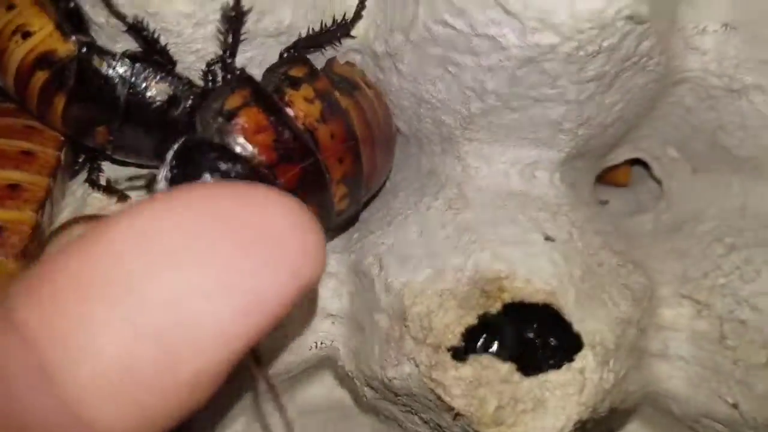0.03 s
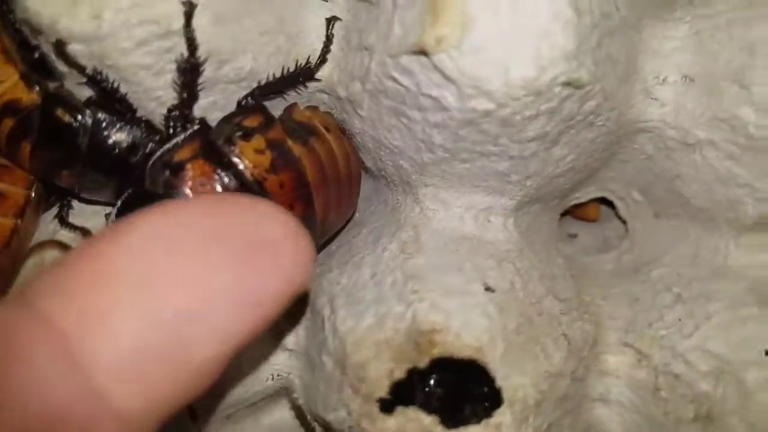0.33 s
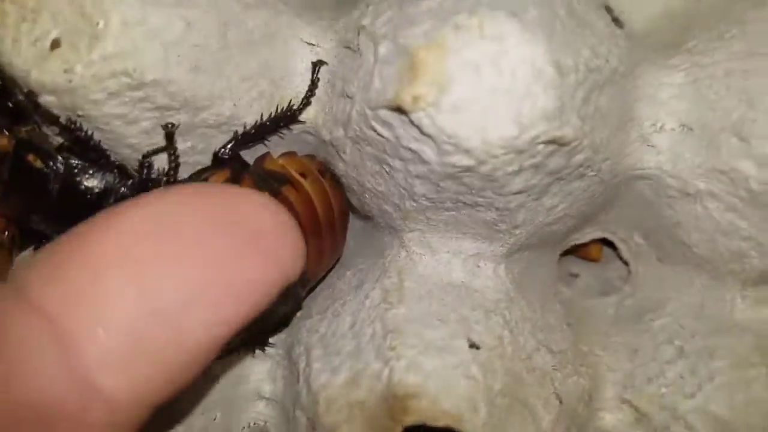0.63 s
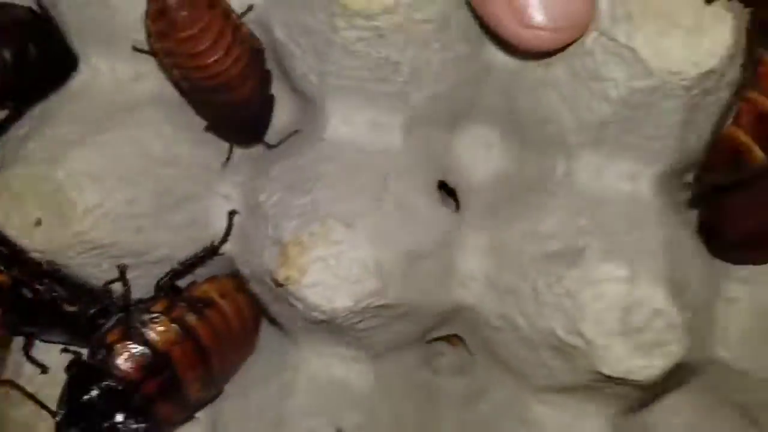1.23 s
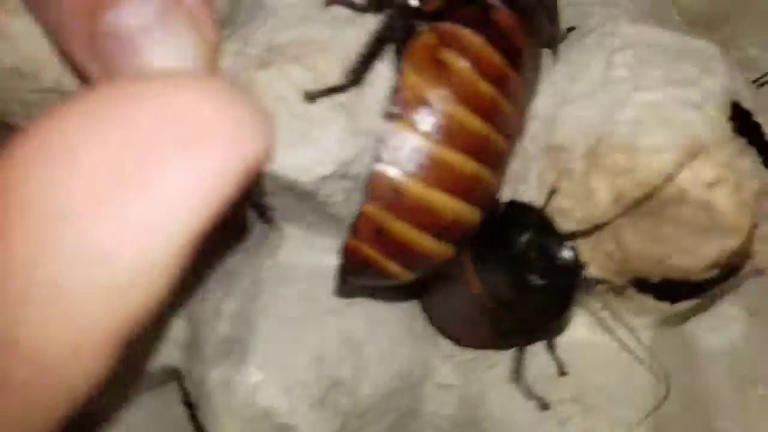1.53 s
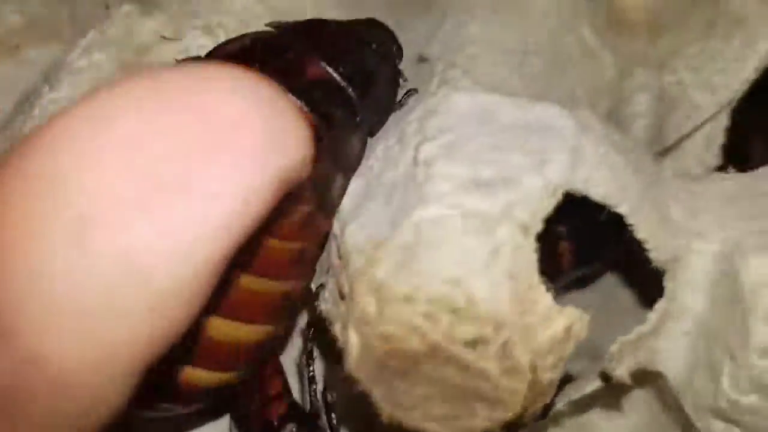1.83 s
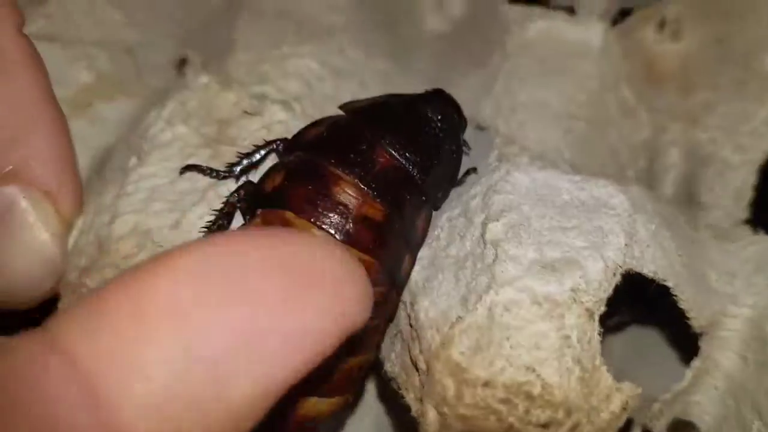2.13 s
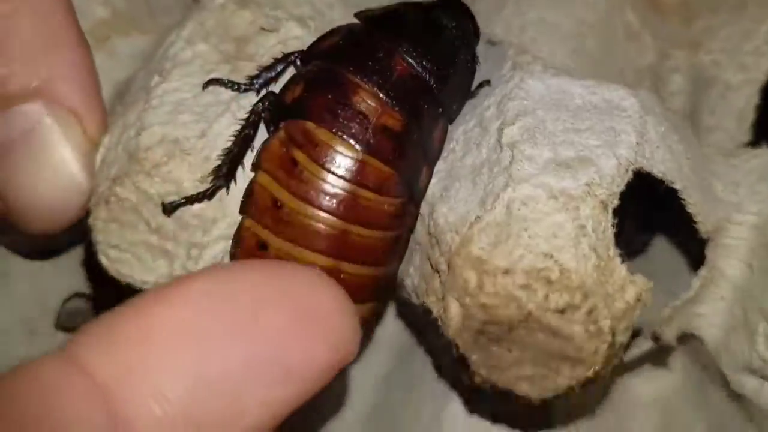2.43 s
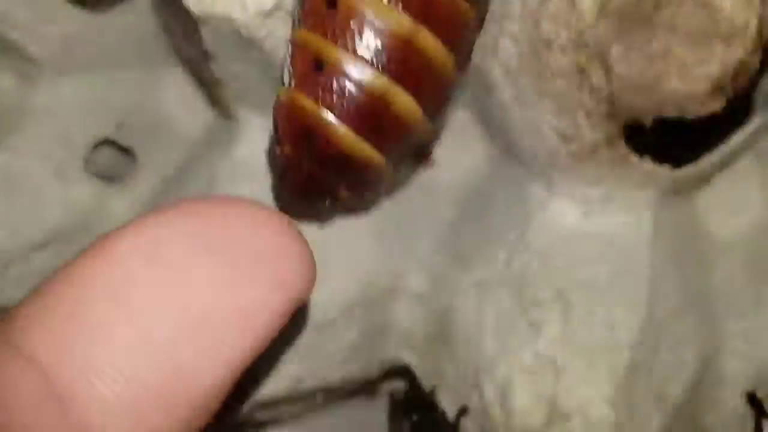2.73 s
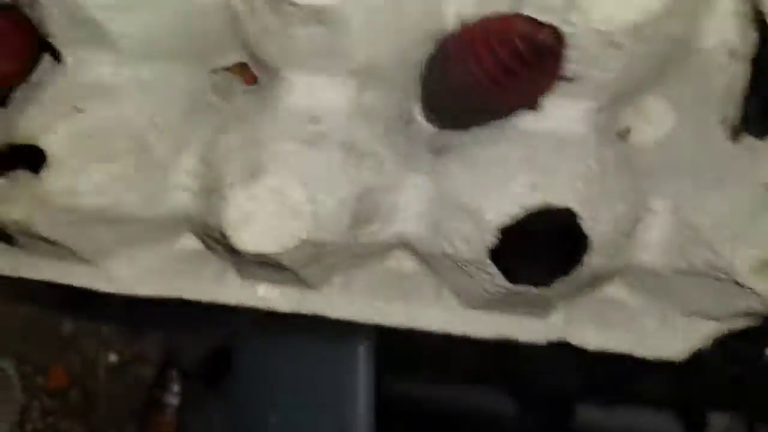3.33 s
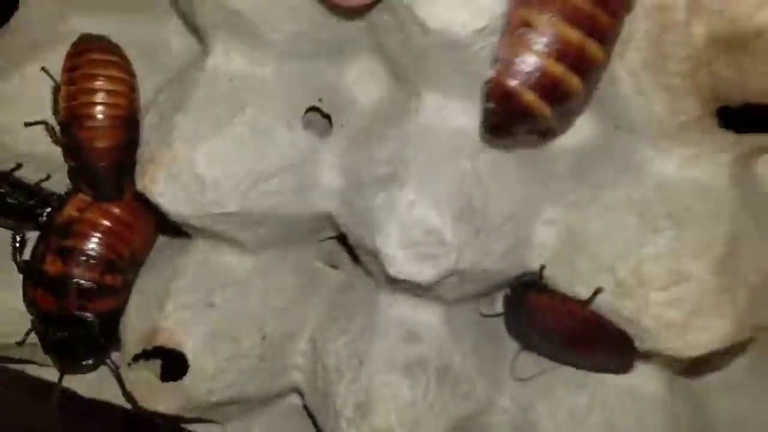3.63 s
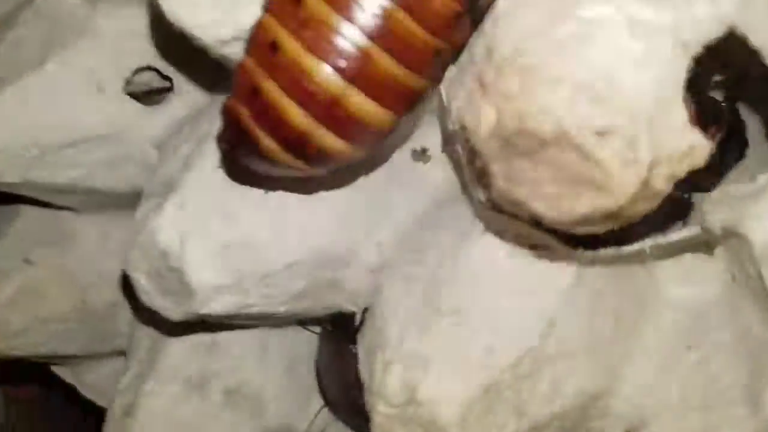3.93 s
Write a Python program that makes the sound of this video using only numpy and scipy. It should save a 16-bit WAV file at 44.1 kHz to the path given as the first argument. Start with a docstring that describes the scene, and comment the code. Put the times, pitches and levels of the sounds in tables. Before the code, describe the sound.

Cockroaches rustle and scratch on a cardboard egg tray, close by in a quiet room with a faint hum. Light prods make short, papery scrapes slightly to the right around 0.6 and 1.3 seconds. At 1.8 a fuller rubbing stroke starts on the left, with a sharper click and soft bump near 2.3. From 2.7 a finer scurrying runs until 4 seconds. Small claw ticks are scattered throughout.

```python
"""A finger prods hissing cockroaches on a cardboard egg tray, close to a hand-held phone in a quiet,
humming room. Shells, spiny legs and skin drag over the pulp in tiny slips: rumble, rasp and hiss.
First come light prods, a little to the right; at 1.8 s a fuller stroke on the left; from 2.7 s a
scurry with a finer grain. All along, feet scratch faintly, claws and shell edges tick, and the tray
takes a few soft bumps."""
import sys
import numpy as np
from scipy import signal
from scipy.fft import rfft, irfft
from scipy.io import wavfile

SR = 44100
rng = np.random.default_rng(int(sys.argv[2]) if len(sys.argv) > 2 else 0)


def log_audio(samples):
    """Write samples as a 16-bit WAV file to the path given in sys.argv[1]."""
    # one column per channel
    frames = np.atleast_2d(samples).T
    # limit to full scale, then quantise
    limited = np.clip(frames, -1, 1)
    pcm = np.round(limited * 32767).astype(np.int16)
    wavfile.write(sys.argv[1], SR, pcm)


N = 176400

# Room tone. Each row: frequency in Hz, relative level in dB.
ROOM_COLOUR = [(25, 0.5), (55, -25), (85, 3.5), (165, 4.5), (300, 4.5), (500, -10), (1000, -8),
               (2000, -6.5), (4000, -15), (8000, -17), (14500, -14)]
# Mains hum. Each row: frequency in Hz, peak level in dB.
MAINS_HUM = [(59.5, -72), (120, -73)]
# How alike the phone's two microphones hear noise. Each row: frequency in Hz, correlation.
MIC_CORRELATION = [(60, 0.8), (300, 0.79), (640, 0.52), (1400, 0.14), (2600, -0.044)]
# Modes of the bumped tray. Each row: frequency in Hz, relative level in dB.
BUMP_MODES = [(325, -7), (410, -3), (560, -4), (720, -3)]
# Soft bumps of the tray. Each row: start in seconds, peak in dB, decay of the lowest mode in seconds,
# left minus right in dB.
TRAY_BUMPS = [(0.443, -45, .004, -2), (0.652, -40, .004, -4), (1.158, -36.5, .002, -5),
              (1.803, -35.5, .02, 5), (2.2705, -27.5, .007, 0), (2.861, -33, .005, 3),
              (3.122, -35.5, .024, 4)]
# Resonances that colour ticks and rustle. Each row: centre in Hz, width in Hz, lift in dB.
CONTACT_RESONANCES = [(401, 55, 4), (716, 60, 3), (1136, 70, 3.5), (1662, 110, 4)]
# Ticks of claws and shells. Each row: start in seconds, ring pitch in Hz, ring level in dB,
# crack level in dB, decay in seconds, left minus right in dB.
CLAW_TICKS = [ (0.028, 2100, -48, -45, .002, -4), (0.146, 2200, -58, -53, .002, -4),
              (0.4305, 1820, -49, -56, .007, 2), (0.4905, 2000, -51, -42, .004, -9),
              (0.524, 4000, -48, -43, .0025, -8), (0.560, 11000, -40, -46, .0015, -5),
              (0.609, 2700, -46, -40, .0008, -5), (0.7025, 2900, -29.5, -37, .002, -3),
              (0.7095, 2740, -32.5, -44, .002, 6), (1.061, 4200, -56, -55, .003, -3),
              (1.157, 1600, -43, -56, .001, -4), (1.264, 1450, -34, -54, .004, -1),
              (1.413, 2900, -43, -52, .002, -3), (1.579, 3500, -53, -47, .002, -5),
              (1.935, 1650, -58, -45.5, 0.0071, -1), (2.1625, 1330, -40, -44, .007, -2),
              (2.261, 1560, -28, -29, .008, -1), (2.270, 5000, -40, -39, .005, 0),
              (2.5535, 920, -35, -42, .008, 0), (2.689, 2460, -54, -45, 0.008, 0),
              (2.8335, 1400, -31, -48, .0015, 2), (2.8565, 1500, -28.5, -46, .0018, 2),
              (2.867, 1510, -38, -45, 0.0019, -6), (2.982, 12000, -33, -38, .003, 8),
              (3.04, 1050, -37, -36, 0.006, 2), (3.117, 2200, -40, -36, .004, 4),
              (3.386, 2130, -40.5, -66, 0.0025, 4), (3.570, 1070, -39, -41, .002, -5),
              (3.593, 1420, -34, -48, 0.0013, 4), (3.648, 5000, -36, -37.5, .002, 6.5),
              (3.685, 3800, -36, -36, .0025, 4), (3.716, 1250, -34, -36, .0035, 0),
              (3.7355, 1400, -38, -43, .0025, -3)]
# Tone of a tick's crack. Each row: frequency in Hz, relative level in dB.
CRACK_COLOUR = [(300, -5), (1500, 7.5), (4000, 6), (7400, 1.5), (12000, .5), (14500, -3)]
# Swells of the three bursts of rustling. Each row: time in seconds, then rumble, rasp and hiss in dB.
PROD_LEVELS = [(0.0, -67.5, -67, -70.5), (0.42, -67.5, -72.5, -72.5), (0.48, -64.5, -62.5, -64),
               (0.555, -65, -59, -60), (0.575, -61, -50, -46.5), (0.598, -62, -55, -55),
               (0.69, -60, -49, -48.5), (0.742, -60, -51, -48.5), (0.781, -61, -58, -56),
               (0.83, -65, -56, -56.5), (0.889, -65.5, -66.5, -65.5), (1.22, -68, -71, -78),
               (1.266, -63, -53, -58), (1.294, -65, -60, -61), (1.312, -61, -51.5, -50),
               (1.338, -63, -56, -50), (1.364, -64, -63, -65.5), (1.6, -68.5, -66, -66),
               (1.791, -63, -59, -63)]
STROKE_LEVELS = [(1.79, -68, -70, -62), (1.806, -55, -49, -56), (1.832, -58, -59, -59),
                 (1.842, -55, -49, -48.5), (1.935, -48.5, -49.5, -49.5), (1.96, -54.5, -55, -56.5),
                 (2.03, -52.5, -50.5, -51.5), (2.152, -54.5, -50.5, -48), (2.17, -52, -40.5, -40.5),
                 (2.22, -56, -49.5, -48), (2.26, -53, -50, -48.5), (2.31, -53, -51.5, -51),
                 (2.39, -50, -51.5, -55), (2.532, -62.5, -56.5, -56), (2.568, -48, -44, -45),
                 (2.63, -62.5, -53, -53), (2.742, -64, -61, -61.5)]
SCURRY_LEVELS = [(2.739, -61, -52.5, -66), (2.8, -43.5, -50.5, -51), (2.87, -52.5, -47, -51),
                 (2.96, -46, -50, -51), (3.01, -49, -55.5, -53.5), (3.13, -56, -52.5, -51.5),
                 (3.19, -50.5, -54, -58), (3.28, -62.5, -57, -56.5), (3.351, -58.5, -58.5, -58.5),
                 (3.376, -57, -46.5, -46.5), (3.42, -58, -50, -53), (3.55, -57.5, -55, -54),
                 (3.604, -52, -49, -51.5), (3.635, -79, -61.5, -61.5), (3.68, -56, -52.5, -50),
                 (3.82, -61, -53.5, -52.5), (3.94, -49.5, -51.5, -53.5), (4.0, -65, -47.5, -49.5)]
# Tone of each burst. Each row: frequency in Hz, relative level in dB.
PROD_TONE = [(100, -4.5), (350, 0.5), (750, -6.5), (1150, 3.5), (1900, 2.5), (2800, 1.5), (6000, -4.5),
             (10000, -4.5), (14500, -7)]
STROKE_TONE = [(200, -0.5), (350, 2.5), (750, -1.5), (1600, -2.5), (2100, -6), (4000, -13.5), (7400, -18),
               (12000, -14), (14500, -19.5)]
SCURRY_TONE = [(200, 0), (350, 0), (750, -6.5), (1600, -6), (2100, -8.5), (4000, -9), (7400, -15),
               (12000, -11.5), (14500, -14)]

TIME = np.arange(N) / SR
BIN_HZ = np.maximum(np.arange(N // 2 + 1) * SR / N, 1)


def undb(db):
    """Decibels to amplitude."""
    return 10 ** (np.asarray(db) / 20)


def unit(x):
    """Scale to rms 1."""
    return x / np.sqrt(np.mean(x ** 2) + 1e-24)


def curve(points):
    """Join (Hz, value) points on a log axis, one value per bin."""
    hz, value = np.array(points, float).T
    return np.interp(np.log(BIN_HZ), np.log(hz), value)


def shape(x, db):
    """Minimum-phase filter with the given gain per bin."""
    cepstrum = irfft(db * np.log(10) / 20, N)
    cepstrum[1:N // 2] *= 2
    cepstrum[N // 2 + 1:] = 0
    return irfft(rfft(x) * np.exp(rfft(cepstrum)), N)


def low_cut(x, hz):
    """Gentle bass roll-off."""
    return signal.sosfilt(signal.butter(2, hz, "high", fs=SR, output="sos"), x)


def pan(db):
    """Constant-power gains; positive dB leans left."""
    return unit(undb([[db / 2], [-db / 2]]))


def mic_noise():
    """Noise at the two microphones: alike in the bass, unrelated in the treble."""
    likeness = curve(MIC_CORRELATION)
    mid, side = irfft(rfft(rng.standard_normal((2, N))) * np.sqrt([1 + likeness, 1 - likeness]), N)
    return unit(np.array([mid + side, mid - side]))


def resonance_db():
    """Lift of the contact resonances per bin."""
    return sum(db / (1 + (2 * (BIN_HZ - hz) / width) ** 2) for hz, width, db in CONTACT_RESONANCES)


def slips(per_s, spread_db, decay_s, smooth=0):
    """Envelope of tiny random slips of uneven size over a share of smooth sliding."""
    size = undb(spread_db * np.minimum(rng.exponential(size=N), 4))
    energy = (rng.random(N) < per_s / SR) * size ** 2
    energy = signal.lfilter([1], [1, -np.exp(-2 / (decay_s * SR))], energy)
    return unit(np.sqrt(energy / energy.mean() + smooth))


def room_tone(noise_db=-63):
    """Quiet room noise with mains hum, a little stronger in the left microphone."""
    hum = sum(undb(db) * np.sin(2 * np.pi * (hz * TIME + rng.random())) for hz, db in MAINS_HUM)
    air = unit(shape(mic_noise(), curve(ROOM_COLOUR)))
    return (undb(noise_db) * air + hum) * pan(2.2)


def reflections(direct, level_db=-16, decay_s=.05):
    """Faint, short reflections reach the phone from 3 ms after the direct sound."""
    t = np.arange(SR // 2) / SR
    tail = rng.standard_normal((2, len(t))) * np.exp(-t / decay_s) * (t > .003)
    tail /= np.sqrt(np.sum(tail ** 2, axis=1, keepdims=True))
    return undb(level_db) * signal.fftconvolve(direct, tail, axes=1)[:, :N]


def idle_feet(level_db=-68.5):
    """Feet shift on the pulp now and then; each scratch is a cluster of tiny spine clicks."""
    scratches = slips(per_s=16, spread_db=2, decay_s=.012)
    spines = slips(per_s=220, spread_db=3, decay_s=.0005)
    return undb(level_db) * unit(mic_noise() * scratches * spines)


def tray_bumps(pitch_spread=.04):
    """Soft knocks ring the hollow tray, a little differently at each spot; higher modes die sooner."""
    t, out = np.arange(SR // 10) / SR, np.zeros((2, N))
    hz, mode_db = np.array(BUMP_MODES, float).T[:, :, None]
    for start, db, decay_s, pan_db in TRAY_BUMPS:
        spot_hz = hz * (1 + pitch_spread * rng.standard_normal(hz.shape))
        envelopes = undb(mode_db) * np.exp(-t / decay_s * hz / hz.min())
        modes = envelopes * np.sin(2 * np.pi * spot_hz * t)
        ring = low_cut(modes.sum(axis=0), hz=260)  # the knocks carry no bass
        i = int(start * SR)
        out[:, i:i + len(t)] -= ring / np.abs(ring).max() * undb(db) * pan(pan_db)
    return out


def claw_ticks(half_width_octaves=.3, snap_db=5, snap_s=.0002):
    """A claw or shell edge snaps free: a broad crack and a short ring of the spot that it leaves."""
    ring_noise, body_db, out = mic_noise(), resonance_db(), 0
    crack = unit(shape(mic_noise(), curve(CRACK_COLOUR) + body_db))
    for start, hz, ring_db, crack_db, decay_s, pan_db in CLAW_TICKS:
        age = np.maximum(TIME - start, 0)
        envelope = (TIME >= start) * np.exp(-age / decay_s)
        snap = undb(snap_db * np.exp(-age / snap_s))  # the crack's first instant stands out
        spot_db = body_db - 20 * np.log10(1 + (np.log2(BIN_HZ / hz) / half_width_octaves) ** 2)
        ring = shape(envelope * ring_noise, spot_db)
        ring *= np.sqrt(np.sum(envelope ** 2) / np.sum(ring ** 2, axis=1, keepdims=True))
        out += (undb(ring_db) * ring + undb(crack_db) * envelope * snap * crack) * pan(pan_db)
    return out


def pulp_friction(spot_share=.6):
    """Papery noise in which each slip briefly rings one small spot of the pulp at its own pitch."""
    noise, spectrum = mic_noise(), 0
    octave = np.log2(np.clip(BIN_HZ, 500, 16000) / 500)
    for k in range(16):  # bands a third of an octave apart
        band = np.cos(np.pi / 2 * np.clip(3 * octave - k, -1, 1))
        spot = slips(per_s=220, spread_db=2.6, decay_s=.004)
        spectrum += rfft(noise * np.sqrt(1 - spot_share + spot_share * spot ** 2)) * band
    return unit(irfft(spectrum, N))


def rustle(friction, levels, tone, pans_db, grit_db):
    """Shells, legs and skin slip, exciting rumble, rasp and hiss together; lower bands ring longer."""
    times, *swells_db = np.array(levels, float).T
    sounding = (TIME >= times[0]) & (TIME < times[-1])
    grain = slips(per_s=1000, spread_db=grit_db, decay_s=.0024, smooth=.5)
    above_rumble, above_rasp = (1 / (1 + (hz / BIN_HZ) ** 8) for hz in (750, 2500))
    bands = (1 - above_rumble, above_rumble * (1 - above_rasp), above_rasp)
    rings_s = (.003, .0012, .0002)
    tone_db, out = curve(tone) + resonance_db(), 0
    for band, ring_s, swell_db, pan_db in zip(bands, rings_s, swells_db, pans_db):
        pole = np.exp(-1 / (ring_s * SR))
        drive = np.sqrt(signal.lfilter([1 - pole], [1, -pole], grain ** 2))
        sound = unit(shape(friction * drive, tone_db + 10 * np.log10(band + 1e-9)))
        swell = sounding * undb(np.interp(TIME, times, swell_db))
        out += sound * swell * pan(pan_db)
    return out


def scene():
    """Prod, stroke and scurry on the tray close to the microphones, with the room behind."""
    friction = pulp_friction()
    prod = rustle(friction, PROD_LEVELS, PROD_TONE, pans_db=(-.8, -1.2, -6), grit_db=3.6)
    stroke = rustle(friction, STROKE_LEVELS, STROKE_TONE, pans_db=(4.5, 2.2, 2.8), grit_db=3.5)
    scurry = rustle(friction, SCURRY_LEVELS, SCURRY_TONE, pans_db=(4.5, 2.2, 4.5), grit_db=2.0)
    contacts = prod + stroke + scurry + idle_feet() + claw_ticks() + tray_bumps()
    direct = low_cut(contacts, hz=184)  # the light tray radiates little bass
    return direct + reflections(direct) + room_tone()


def record(dry):
    """The hand-held phone cuts the treble above 14.6 kHz."""
    return signal.sosfilt(signal.ellip(10, .2, 70, 14600, fs=SR, output="sos"), dry)


dry = scene()
out = record(dry)
log_audio(out)
```